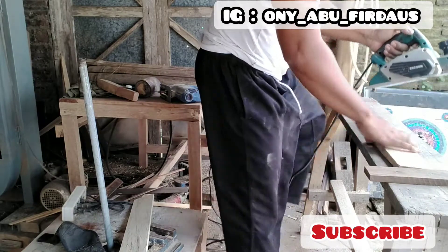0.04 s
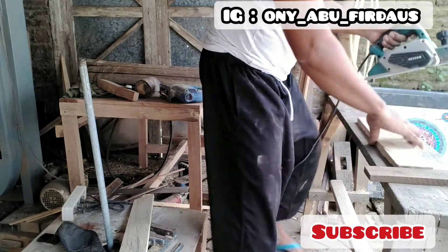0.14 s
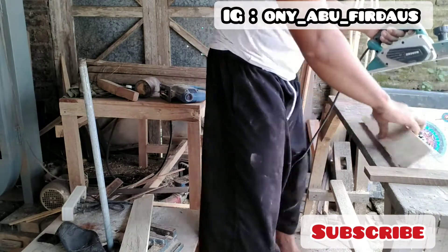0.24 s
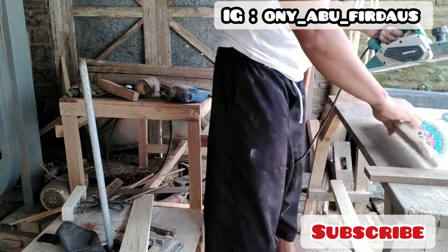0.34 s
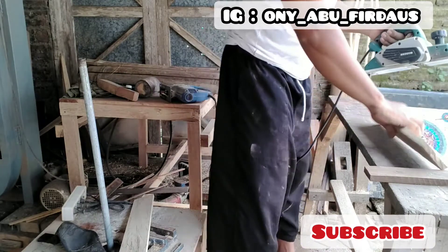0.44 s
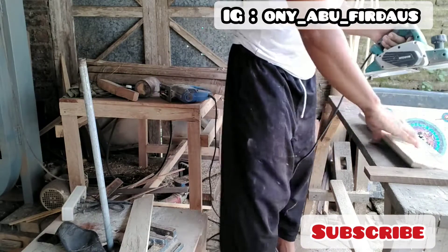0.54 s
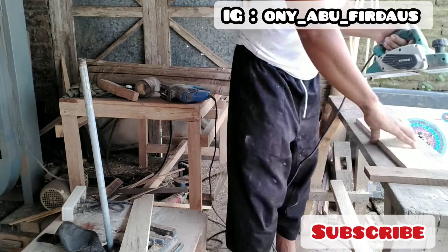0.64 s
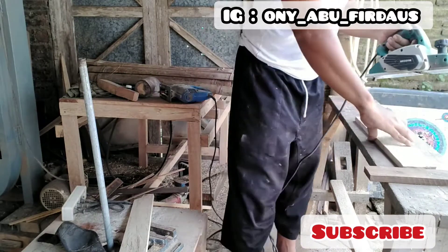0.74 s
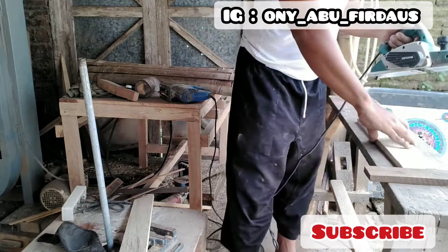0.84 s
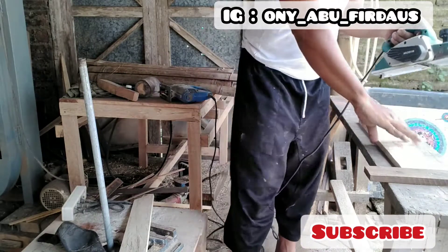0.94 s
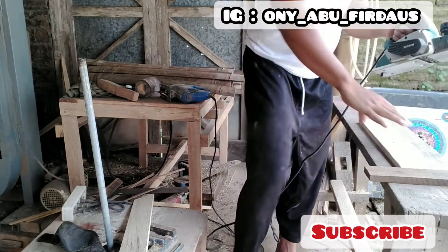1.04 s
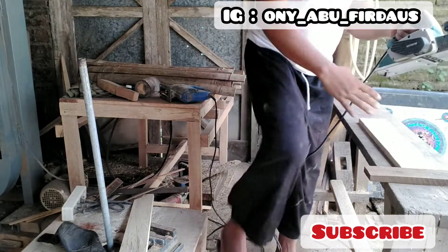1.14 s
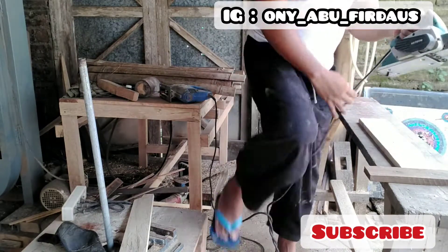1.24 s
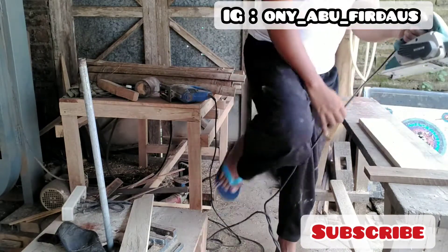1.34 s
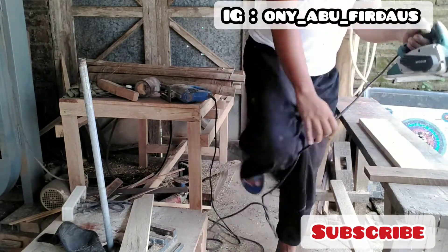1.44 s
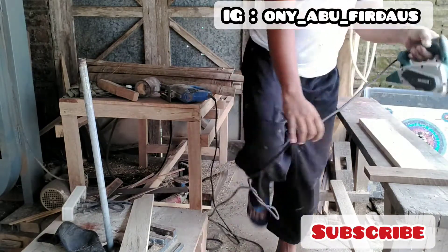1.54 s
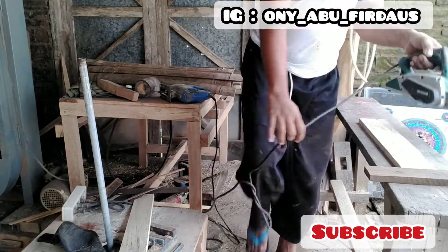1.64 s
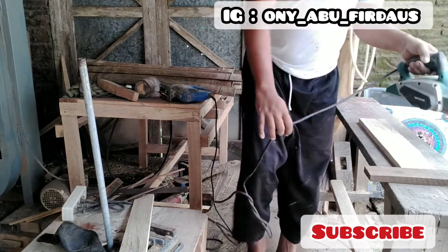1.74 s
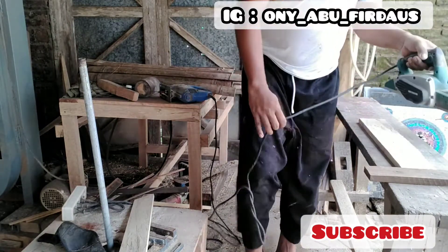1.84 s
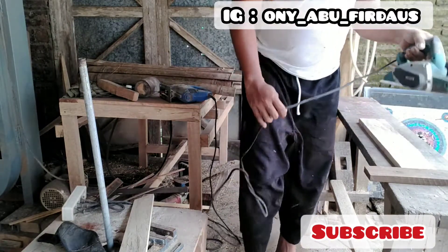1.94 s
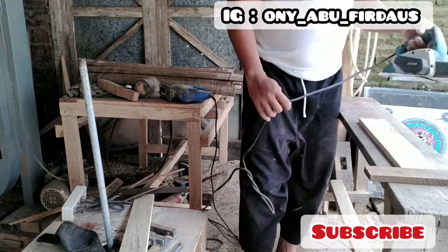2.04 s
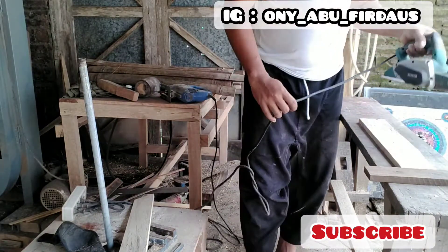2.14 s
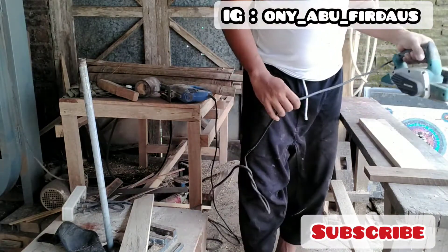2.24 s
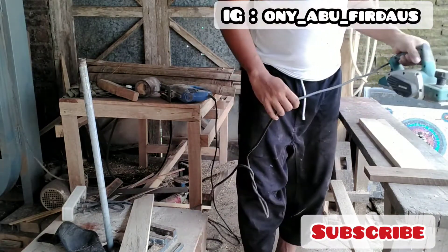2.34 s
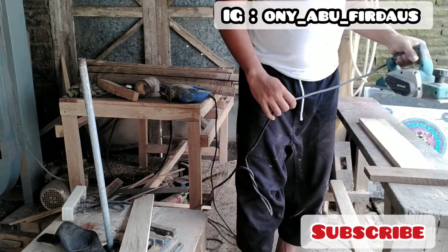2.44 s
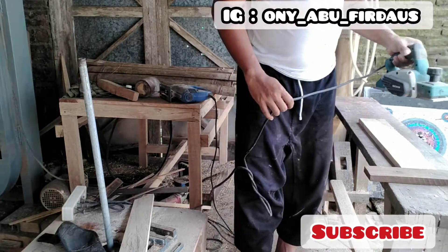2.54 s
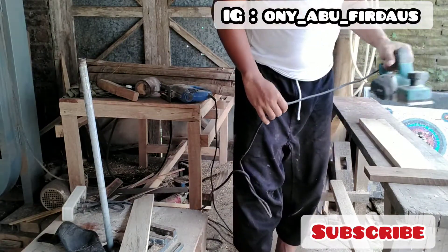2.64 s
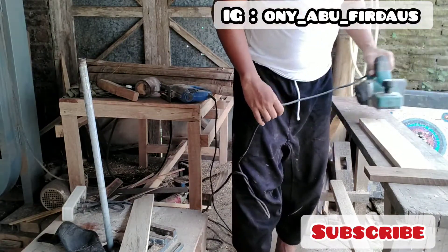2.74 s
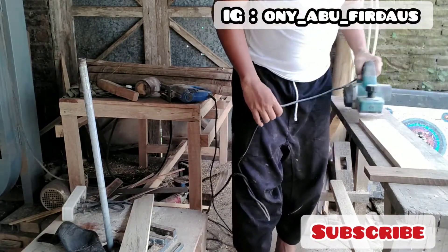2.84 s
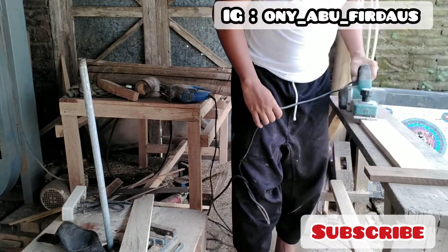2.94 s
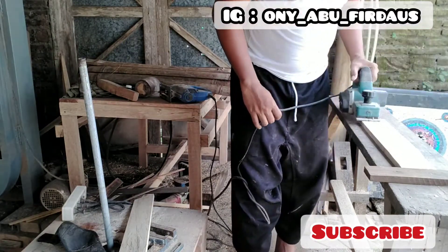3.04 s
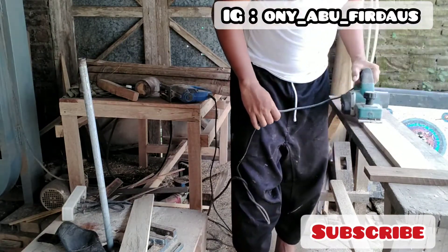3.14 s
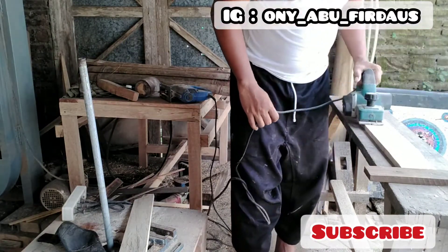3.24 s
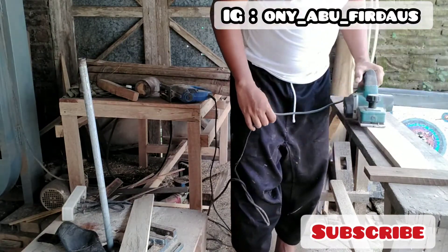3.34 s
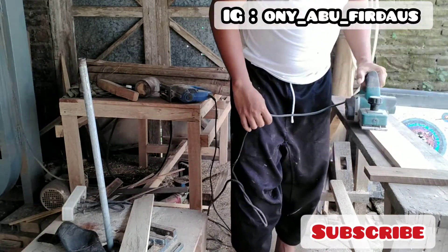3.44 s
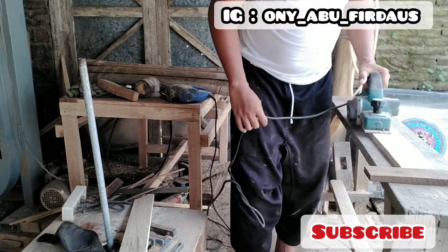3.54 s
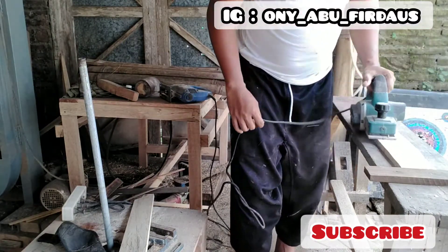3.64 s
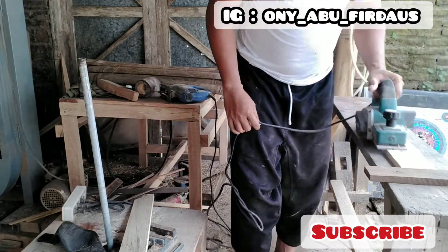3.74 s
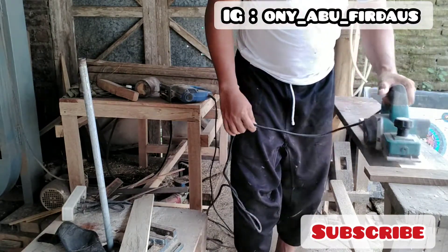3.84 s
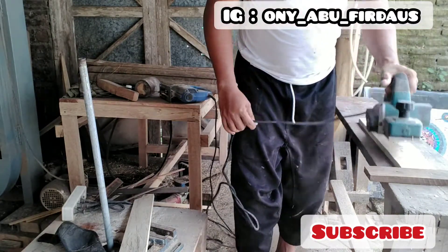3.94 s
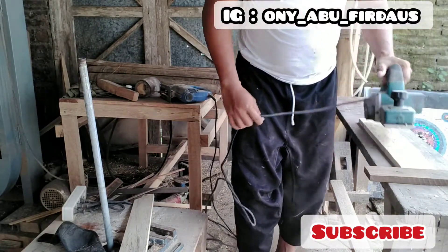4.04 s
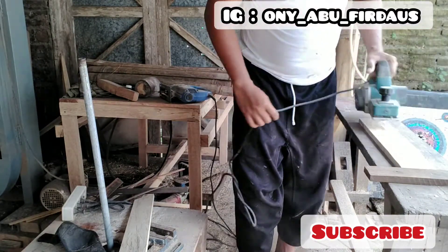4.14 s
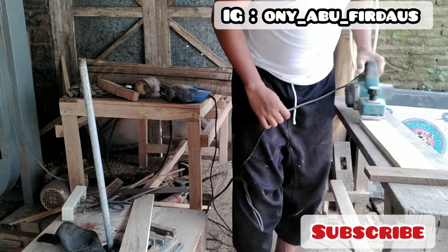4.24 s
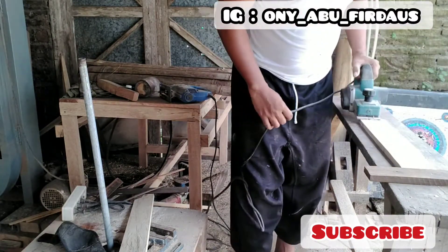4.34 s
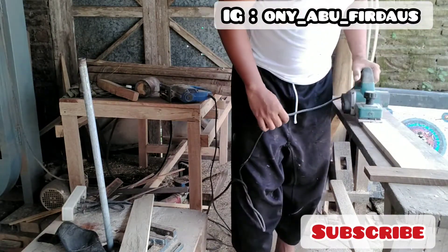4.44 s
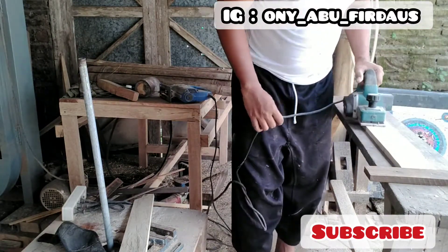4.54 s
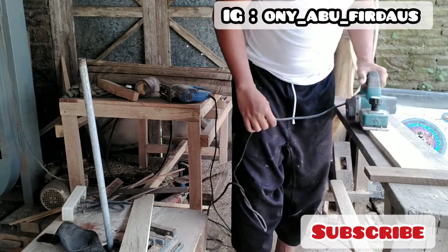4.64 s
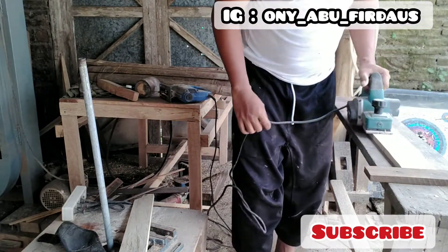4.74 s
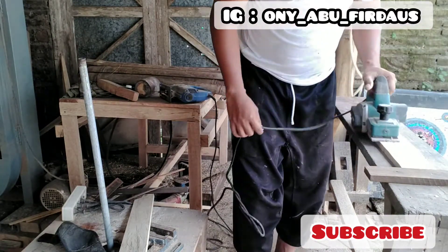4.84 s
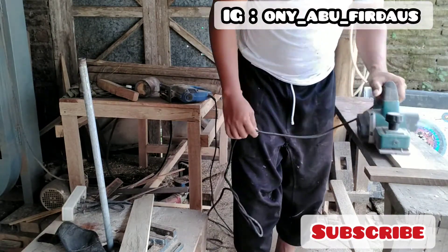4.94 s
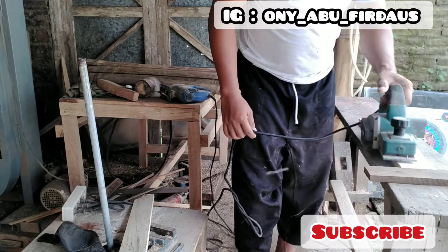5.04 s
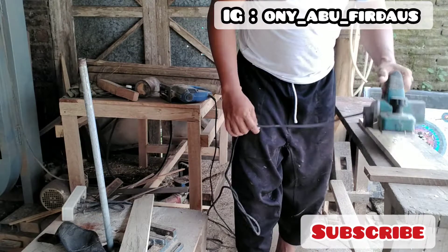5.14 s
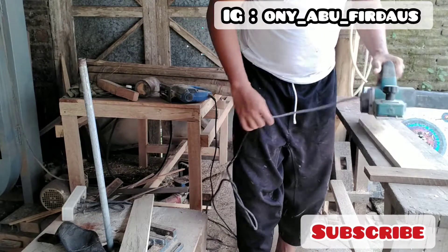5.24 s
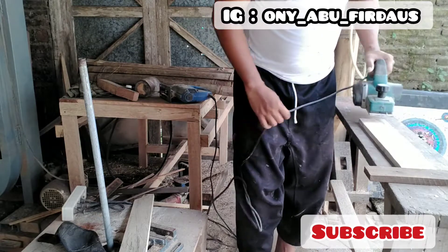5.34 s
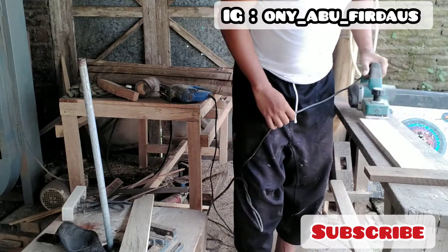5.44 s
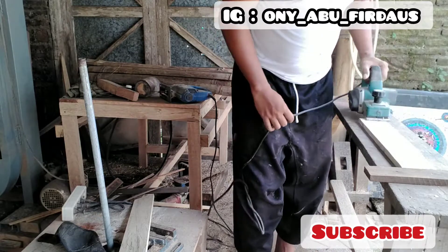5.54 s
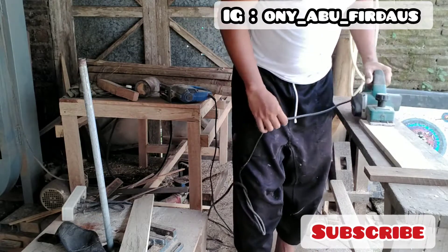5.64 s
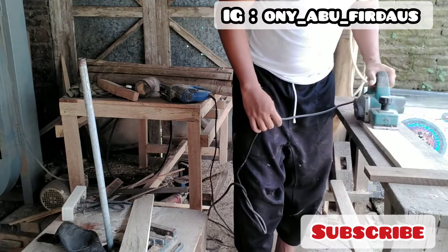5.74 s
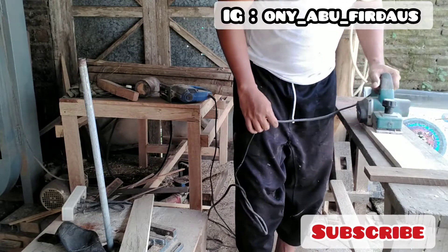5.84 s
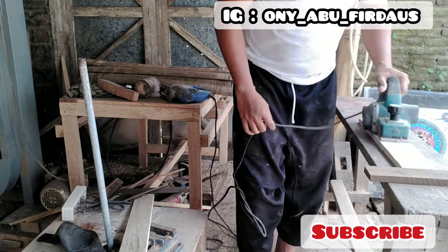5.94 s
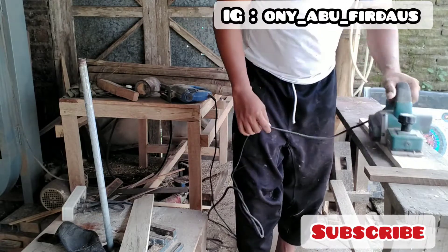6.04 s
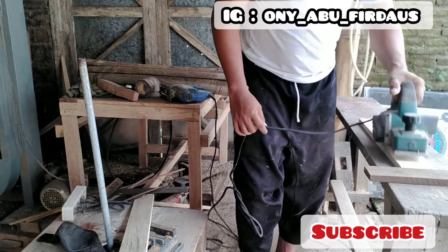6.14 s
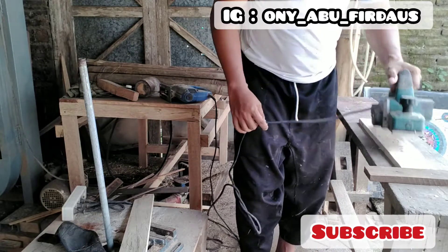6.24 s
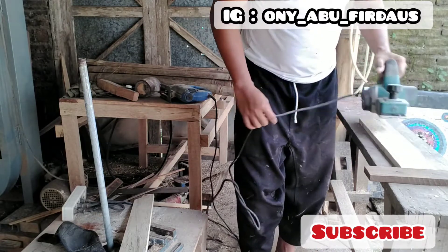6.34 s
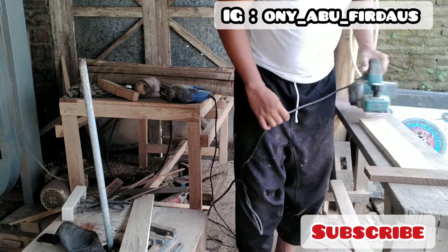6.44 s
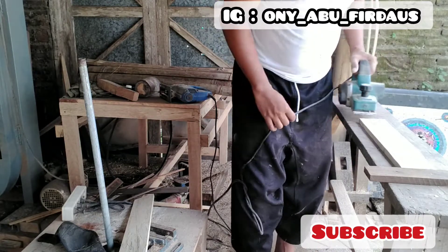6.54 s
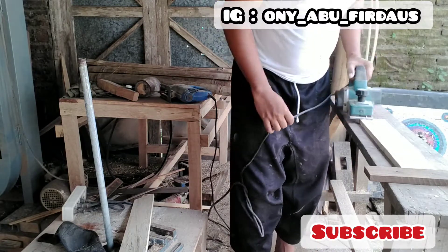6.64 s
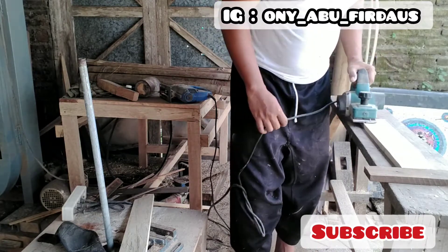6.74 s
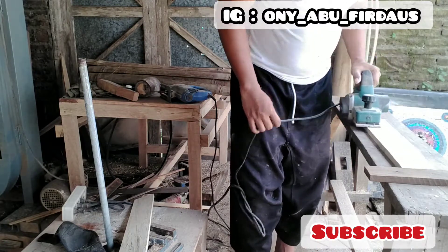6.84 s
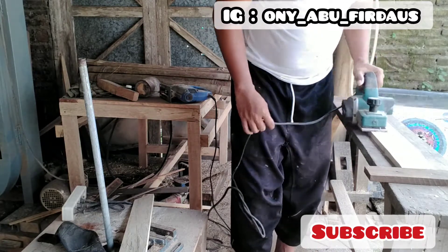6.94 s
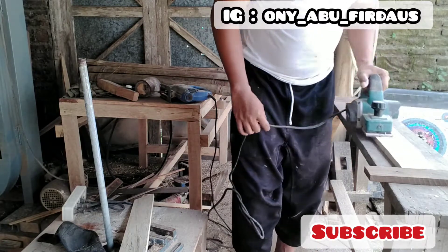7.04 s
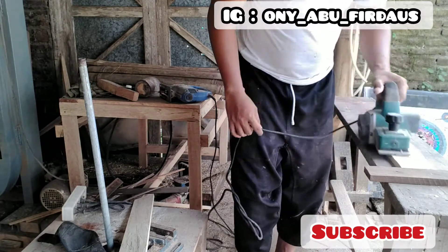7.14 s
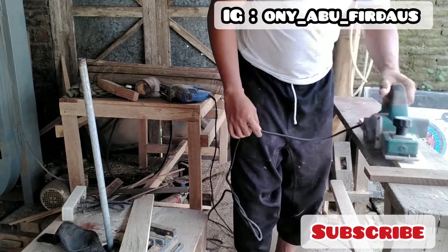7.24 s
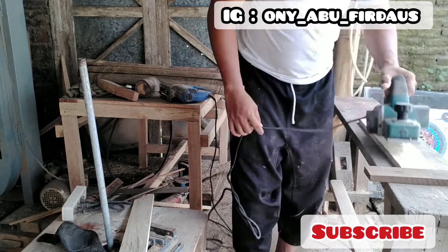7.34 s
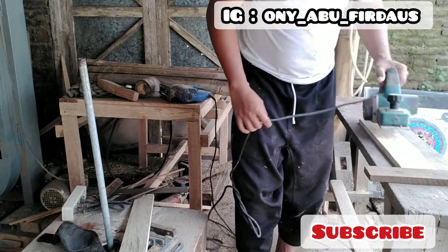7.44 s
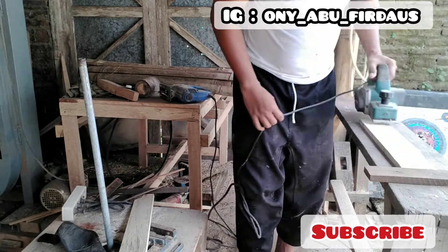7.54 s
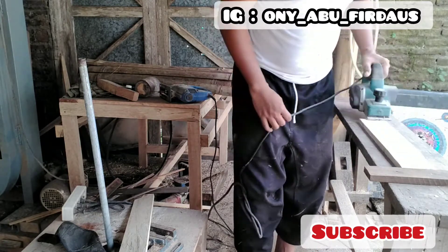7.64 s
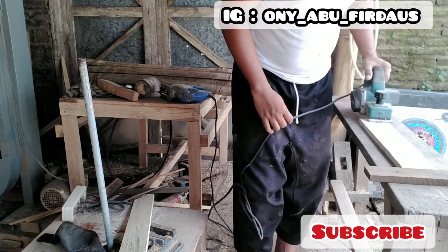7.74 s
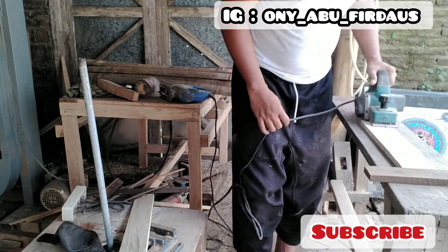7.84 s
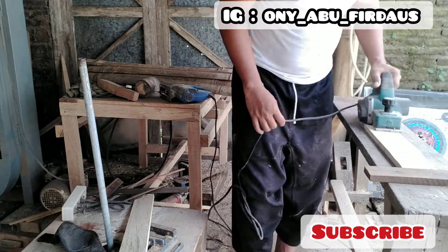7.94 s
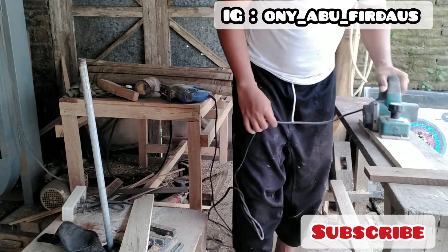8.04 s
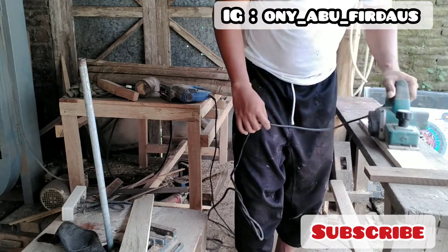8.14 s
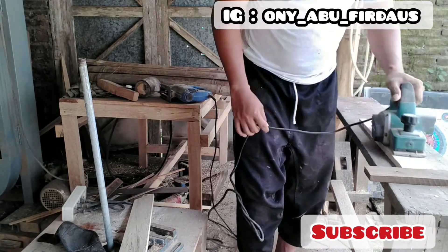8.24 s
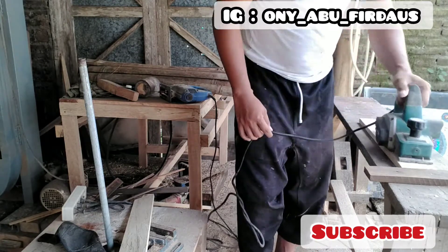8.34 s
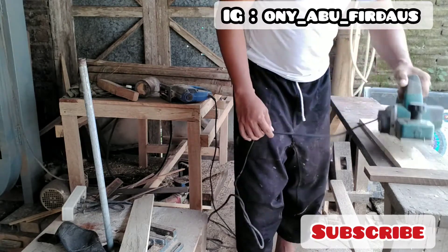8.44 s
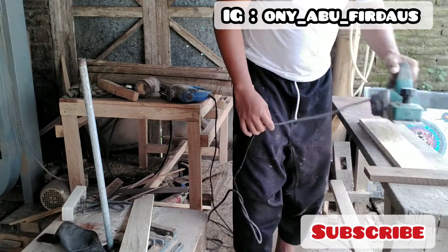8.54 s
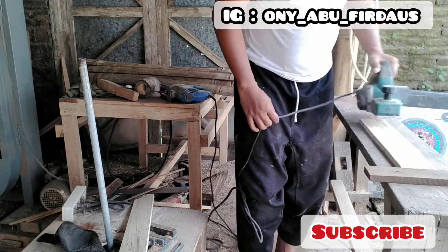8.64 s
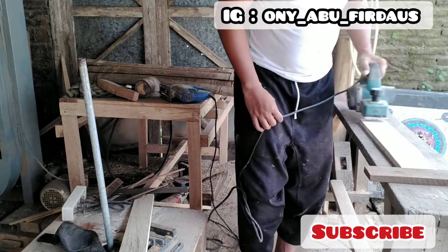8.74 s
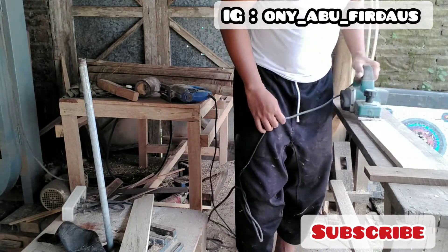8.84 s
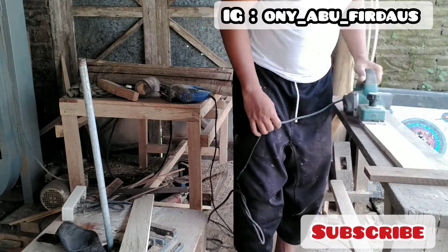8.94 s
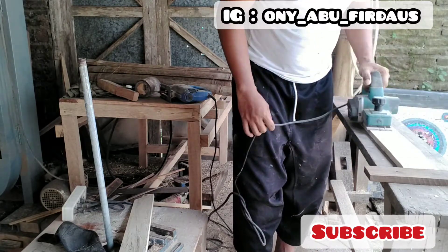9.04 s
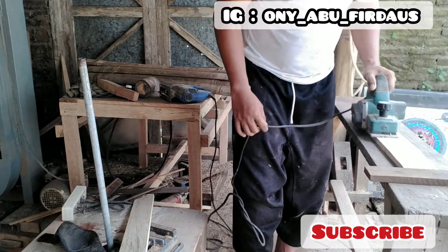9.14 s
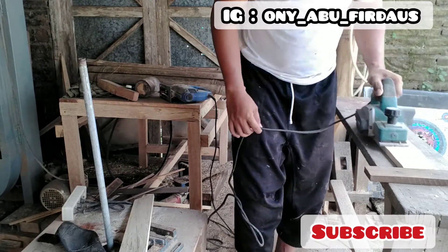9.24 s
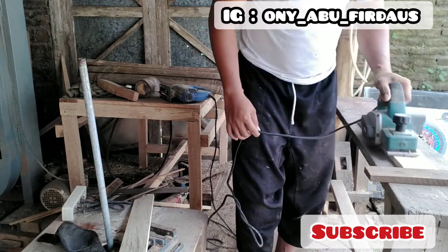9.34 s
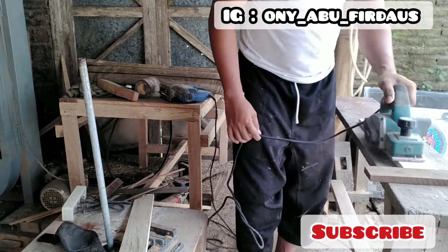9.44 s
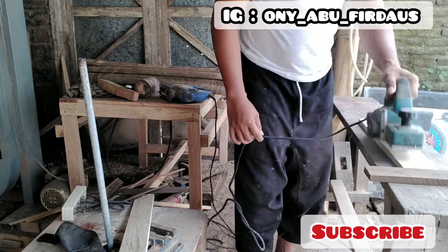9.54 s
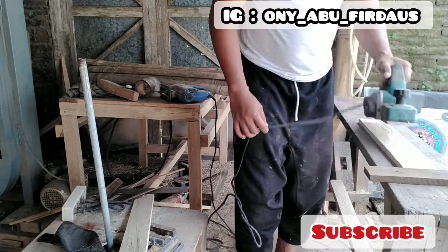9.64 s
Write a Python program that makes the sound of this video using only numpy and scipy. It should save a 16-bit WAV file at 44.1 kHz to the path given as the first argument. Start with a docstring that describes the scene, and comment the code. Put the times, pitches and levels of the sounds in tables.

```python
"""An electric hand planer runs up, its belt squealing, and makes six strokes along a board.
Motor and two-knife drum whine at unrelated pitches as summed shaft harmonics over a chopped noise fan rush.
In the wood, knife passes become pulses through resonances, chips are noise puffs and load drags the speed down.
Before it the board is flipped over and knocks on the bench (decaying modes and noise), with rubbing and
a faint clink; quiet workshop noise lies under everything."""
import sys
import numpy as np
from scipy import signal
from scipy.fft import rfft, irfft, next_fast_len
from scipy.io import wavfile
from scipy.ndimage import map_coordinates

SR = 44100
rng = np.random.default_rng(int(sys.argv[2]) if len(sys.argv) > 2 else 0)


def store_wav(level_fs):
    """Save 16-bit WAV to argv[1]."""
    pcm = np.round(np.clip(np.atleast_2d(level_fs), -1, 1) * 32767)
    wavfile.write(sys.argv[1], SR, pcm.T.astype(np.int16))


N = 427769
TIME = np.arange(N) / SR

# strong shaft partials: motor_order, drum_order, relative_idle_db, share_of_cut_whine_db
STRONG_PARTIALS = [(1, 0, -20, -0.4049), (2, 0, -19.5, -0.55), (3, 0, -25, 0), (4, 0, -20.5, -0.58),
                   (0, 2, -22, -0.43), (0, 4, -24.5, -0.13), (0, 6, -22, 0.31), (0, 8, -29, 1),
                   (0, 10, -30, 1), (0, 12, -33, 0.48)]
# weak shaft partials and combination tones: motor_order, drum_order, relative_level_db
WEAK_PARTIALS = [(5, 0, -16.5), (6, 0, -32), (8, 0, -26), (9, 0, -28), (0, 56, -26), (0, 3, -21),
                 (0, 14, -19.5), (1, 1, -13.5), (2, -1, -26.5), (1, 2, -25), (3, -1, -11), (2, 1, -9.5),
                 (2, 2, -21), (3, 1, -15), (2, 4, -17.5)]
# housing and bench response to the partials: freq_hz, gain_db
BODY_RESPONSE = [(280, -12), (370, -7), (425, 0), (452, -21), (482, -5.5), (503, -11), (535, -5),
                 (562, -8.5), (590, 1), (610, -8), (760, -7), (950, -1), (1025, -1), (1060, 1.5),
                 (1100, 0.5), (1145, 2.5), (1210, -3), (1400, -5.5), (1458, 3.5), (1510, -1.5), (1595, -9),
                 (1700, -0.5), (1810, -6.5), (1900, -3), (1960, 2), (2040, 0), (2130, 0), (2230, -3.5),
                 (2350, -0.5), (2620, 3.5), (2850, -3.5), (2990, -4), (3200, -6.5)]
# fan rush and rattle spectrum: freq_hz, relative_db
FAN_SPECTRUM = [(30, -30), (100, -27), (190, -27.5), (280, -15.5), (450, -9), (750, -0.5), (1300, -1.5),
                (2200, 1), (3300, -7.5), (4500, -15), (6600, -24.5), (8500, -13.5), (12500, -28),
                (15500, -28.5)]
# tool pushed nearer and drawn back: nearest_s, gain_db
PUSHES = [(3.1, 2), (3.9, 3), (5.2, 1.5), (6.3, 1), (7.38, 1), (8.55, 0.5), (9.6, 0.9)]
# knives in the wood: start_s, end_s, bite_db, whine_gain_db, drag_in_turns_per_s2, drag_out_turns_per_s2
CUTS = [(3.391, 3.512, -24.5, 9.1, 72.4, 89.95), (3.518, 3.635, -25, 9.3, 265, 214.9),
        (3.852, 3.884, -34.5, 7, 5, 50), (4.676, 4.847, -25, 12.2, 81, 335.4),
        (5.024, 5.068, -29, 7.2, 294, 148.2), (5.753, 5.952, -23, 6.3, 242, 377.6),
        (6.1, 6.179, -28, 7, 180, 80.05), (6.907, 7.147, -25, 5.2, 270, 196.2),
        (7.226, 7.291, -29.5, 4.6, 95, 64.6), (7.976, 8.123, -28, 14, 90, 118.2),
        (8.2, 8.438, -28, 10, 148, 110.2), (9.091, 9.292, -27.5, 13.2, 83, 159.7),
        (9.309, 9.531, -27, 9, 166, 129)]
# knife buzz spectrum: freq_hz, relative_db
KNIFE_SPECTRUM = [(200, -10), (1000, -18), (2300, 8.5), (3400, 8.5), (4400, 2.5), (6200, -5.5), (7500, -1),
                  (8800, 2.5), (10500, -19), (15000, -21)]
# chip hiss spectrum: freq_hz, relative_db
CHIP_SPECTRUM = [(40, -16), (100, 3), (180, 5), (280, 11.5), (500, -0.5), (2400, 9.5), (4500, -20),
                 (6500, -35), (8600, 6), (10500, 1), (15000, -14)]
# slipping belt: time_s, pitch_hz, relative_level_db
BELT_SQUEAL = [(2.302, 8400, -72), (2.31, 8070, -23), (2.328, 7120, -18.5), (2.345, 6900, -21.5),
               (2.365, 5500, -22), (2.42, 5700, -23), (2.48, 6800, -23.5), (2.495, 6750, -35),
               (2.54, 6650, -58)]
# board on bench, then trigger and motor kick: start_s, relative_peak_db, hardness_hz, attack_s
KNOCKS = [(0.503, -30, 1500, 0.00081), (0.522, -17.5, 1590, 0.00074), (0.551, -24, 900, 0.0018),
          (0.588, -29, 700, 0.0022), (0.676, -35, 900, 0.00091), (0.699, -34, 2500, .003),
          (0.712, -10, 2450, 0.00034), (0.957, -16, 1540, 0.0053), (0.978, -24, 1400, 0.0028),
          (2.313, -23, 2780, 0.00074), (2.323, -19.5, 2800, 0.0008)]
# ringing modes of the board: freq_hz, relative_level_db, t60_s
BOARD_MODES = [(212, -13, 0.24), (495, -14, 0.23), (700, -9.5, 0.34), (860, -30, .18), (1009, -10.5, 0.14),
               (1310, -5, 0.073), (1572, -7, 0.13), (1996, -11, 0.091), (2470, -3, 0.087), (3400, -9, 0.08)]
# woody clack spectrum: freq_hz, relative_db
CLACK_SPECTRUM = [(50, -28), (110, -15), (210, -2), (400, -2), (720, 0.5), (1500, 1.5), (3000, -10.5),
                  (5000, -27), (8600, -7), (13000, -23)]
# hand, board and cloth brushing past: centre_s, level_db, sigma_s, treble_gain_db
SCUFFS = [(0.252, -49.5, 0.012, -2), (0.312, -52, 0.036, -3), (0.376, -45, 0.021, 4),
          (0.667, -59, 0.029, -2), (0.735, -43.5, 0.027, -7), (0.812, -43.5, 0.02, -10),
          (0.864, -38, 0.021, -2), (1.149, -48, 0.017, 7), (1.976, -61, .012, 0), (2.096, -54.5, 0.049, 0),
          (2.165, -63, .01, 0)]
# rubbing spectrum: freq_hz, relative_db
RUB_SPECTRUM = [(40, -31), (350, -2), (750, -3), (1100, -1.5), (1700, -1), (2450, 2), (3200, -3.5),
                (4200, -10), (5300, -17), (7000, -17), (8600, -8), (11000, -24), (15000, -27)]
# metallic ring: freq_hz, level_db, t60_s
CLINK_MODES = [(2450, -50, .45), (3480, -54, 0.31), (4370, -52, 0.18)]
# quiet workshop spectrum: freq_hz, relative_db
FLOOR_SPECTRUM = [(25, -36), (75, -2), (130, 5), (350, 3), (680, -3.5), (745, 8), (820, -2.5), (1200, -7.5),
                  (1900, -8), (5500, -26), (8600, -23), (11000, -42), (15500, -46)]
# workshop decay: freq_hz, t60_s
ROOM_DECAY = [(150, 0.17), (1000, 0.19), (4000, 0.36), (12000, 0.028)]

SWITCH_ON_S = 2.3
FREE_TURNS_PER_S, INERTIA_S = 576.3, 0.836
SURGE_SHARE, SURGE_S = 0.527, 0.177  # share of speed won quickly by the starting current
DRUM_RATIO = 0.5595  # drum turns per motor turn, before belt slip
BELT_GIVE_S, BELT_LAG_S = 0.061, 0.02  # motor-side speed lost to slip per unit drag, and its delay
DRAG_ATTACK_S, DRAG_RELEASE_S = 0.012, 0.046
TORQUE_PULSE_HZ = 100  # twice per mains cycle

FAN_START_DB, FAN_FULL_DB, FAN_FULL_TURNS_PER_S = -36, -23, 452  # before pushes
PUSH_SIGMA_S = 0.23
WHINE_DB, WHINE_GROWTH = -2.5, 0.63  # growth: dB of whine per dB of fan rush
SWELL_DB, SWELL_KNOTS_PER_S = 2.1, 12  # partials swell and fade as the tool moves
WHINE_RELEASE_S = 0.17  # cut's whine change dies away

BITE_ATTACK_S, BITE_RELEASE_S = 0.0084, 0.048
ENTRY_DB, ENTRY_S = 4, 0.026  # harder bite on entering the wood
BUZZ_DB, CHIPS_DB = 3.5, -3  # over the bite
PASS_JITTER_S = 4e-6

SLOTS_PER_TURN = 12
SLOT_DB, SLOT_RING_HZ, SLOT_HALF_WIDTH_HZ = -20, 3140, 48  # housing resonance
TOP_HZ = 15850


def whine(motor_turns, drum_turns, air_db, whine_db):
    """Shaft harmonics and sum/difference tones; cutting lowers motor orders and lifts high knife orders."""
    strong = np.zeros(N)
    for motor_order, drum_order, idle_db, share in STRONG_PARTIALS:
        turns = motor_order * motor_turns + drum_order * drum_turns
        pitch_hz = np.abs(np.gradient(turns)) * SR
        swell_db = SWELL_DB * wobble(SWELL_KNOTS_PER_S)
        level_db = idle_db + share * whine_db + along(BODY_RESPONSE, pitch_hz) + swell_db
        strong += amp(level_db) * partial(turns, flutter_db=2.5, jitter_rad=0.18)
    weak = np.zeros(N)
    for motor_order, drum_order, db in WEAK_PARTIALS:
        turns = motor_order * motor_turns + drum_order * drum_turns
        weak += amp(db + 1.5 * wobble(7)) * partial(turns, flutter_db=3, jitter_rad=0.3)
    fade_in = np.clip((TIME - 2.45) / 0.16, 0, 1)
    strong_gain = amp(WHINE_GROWTH * (air_db - FAN_FULL_DB) + WHINE_DB)
    return fade_in * (strong_gain * strong + amp(air_db - 2) * room(weak, wet_db=-2.5))


def partial(turns, flutter_db, jitter_rad):
    """A sine of rms 1 with random level flutter and phase jitter."""
    jitter = jitter_rad * (wobble(45) + 0.49 * wobble(220))
    return unit(amp(flutter_db * wobble(28)) * np.sin(2 * np.pi * turns + jitter))


def fan(motor_turns, drum_turns, air_db):
    """Air chopped once a motor turn, plus housing rattle when both shafts shake it at once."""
    motor_phase, drum_phase = 2 * np.pi * motor_turns, 2 * np.pi * drum_turns
    air = unit((1 + 0.45 * np.cos(motor_phase)) * rng.standard_normal(N))
    rush = unit(coloured(air, FAN_SPECTRUM))
    shakes = np.exp(6 * np.cos(motor_phase + 0.18 * wobble(90)) + 9 * np.cos(drum_phase))
    shakes = shakes * (TIME > SWITCH_ON_S)
    jolts = np.diff(shakes, prepend=shakes[0])
    rattle = unit(room(coloured(jolts, FAN_SPECTRUM), wet_db=3))
    torque = np.cos(2 * np.pi * TORQUE_PULSE_HZ * TIME)
    level_db = air_db + 0.5 * torque + 0.73 * wobble(35)
    return amp(level_db) * (amp(-0.1) * rush + amp(-7) * rattle)


def cutting(drum_turns, bite):
    """Each knife pass strikes the wood with a sharp pulse and throws a decaying puff of chips."""
    streaks = amp(1.17 * wobble(30))  # hard and soft streaks in the board
    passes = 2 * drum_turns
    buzz = unit(coloured(ringing(knife_blows(passes), t60_s=0.03), KNIFE_SPECTRUM))
    puffs = amp(-7 * (passes % 1)) * rng.standard_normal(N)
    chips = unit(coloured(puffs, CHIP_SPECTRUM))
    wet_buzz = room(amp(BUZZ_DB) * streaks * bite * buzz, wet_db=-6)
    return wet_buzz + amp(CHIPS_DB) * streaks * bite * chips


def knife_blows(passes):
    """One band-limited pulse per knife pass, alternating in size as one knife stands proud."""
    count = np.arange(1, int(passes[-1]))
    timing, strength = rng.standard_normal((2, len(count)))
    at_sample = np.interp(count, passes, np.arange(N)) + SR * PASS_JITTER_S * timing
    size = amp(1.2 * strength) * (1 + 0.75 * (-1) ** count)
    # 16-tap sinc places each pulse between samples
    taps = at_sample.astype(int)[:, None] + np.arange(-7, 9)
    pulses = size[:, None] * np.sinc(taps - at_sample[:, None])
    return np.bincount(np.clip(taps, 0, N).ravel(), pulses.ravel(), N + 1)[:N]


def ringing(x, t60_s):
    """Dense short resonances: gliding partials swell and fade as they cross them."""
    t = np.arange(SR // 10) / SR
    response = rng.standard_normal(len(t)) * amp(-60 * t / t60_s)
    return unit(signal.fftconvolve(x, response)[:N])


def start_up(motor_turns, motor_speed):
    """Belt squeals under pulsing starting torque; armature slots sing through a housing resonance."""
    pitch_hz, level_db = curves(BELT_SQUEAL, outside=-120)
    torque = np.sin(2 * np.pi * TORQUE_PULSE_HZ * TIME)
    pitch_hz = pitch_hz * (1 + 0.029 * torque + 0.042 * wobble(1500))
    phase = 2 * np.pi * np.cumsum(pitch_hz) / SR
    overtone = amp(-13) * np.sin(2 * phase + wobble(2800))
    squeal = amp(level_db + 3.1 * torque) * (np.sin(phase) + overtone)
    detune = (SLOTS_PER_TURN * motor_speed - SLOT_RING_HZ) / SLOT_HALF_WIDTH_HZ
    resonance = (TIME > SWITCH_ON_S) / np.hypot(1, detune)
    slot_phase = 2 * np.pi * SLOTS_PER_TURN * motor_turns + wobble(400)
    slots = amp(SLOT_DB) * resonance * np.sin(slot_phase)
    return room(amp(5) * squeal + slots, wet_db=-6.5)


def strokes():
    """Cuts as three controls: knife bite gain, whine change in dB, drag on the drive."""
    bite, whine_db, drag = np.zeros((3, N))
    for start, end, bite_db, gained_db, drag_in, drag_out in CUTS:
        contact = gate(start, end, BITE_ATTACK_S, BITE_RELEASE_S)
        entry_db = ENTRY_DB * np.exp(-np.maximum(TIME - start, 0) / ENTRY_S)
        bite = np.maximum(bite, amp(bite_db + entry_db) * contact)
        whine_db = np.maximum(whine_db, gained_db * gate(start, end, BITE_ATTACK_S, WHINE_RELEASE_S))
        load = np.interp(TIME, [start, end], [drag_in, drag_out])
        drag = drag + load * gate(start, end, DRAG_ATTACK_S, DRAG_RELEASE_S)
    return bite, whine_db, drag


def shaft_speeds(drag):
    """Turns per s: motor runs up and sags under drag; drum sags further as the belt slips."""
    t = np.maximum(TIME - SWITCH_ON_S, 0)
    run_up = 1 - SURGE_SHARE * np.exp(-t / SURGE_S) - (1 - SURGE_SHARE) * np.exp(-t / INERTIA_S)
    loaded = np.maximum(FREE_TURNS_PER_S * run_up - lagged(drag, INERTIA_S), 0)
    motor_speed = loaded * (1 + 0.000838 * wobble(25))
    slip = BELT_GIVE_S * lagged(drag, BELT_LAG_S)
    drum_speed = DRUM_RATIO * (motor_speed - slip) * (1 + 0.0008 * wobble(30))
    return motor_speed, drum_speed


def rush_level(motor_speed):
    """Fan rush in dB: grows with speed squared up to full flow, swells as the tool comes near."""
    flow = np.minimum(motor_speed / FAN_FULL_TURNS_PER_S, 1) ** 2
    near_db = sum(db * np.exp(-0.5 * ((TIME - s) / PUSH_SIGMA_S) ** 2) for s, db in PUSHES)
    level_db = FAN_START_DB + (FAN_FULL_DB - FAN_START_DB) * flow + near_db
    return np.where(TIME > SWITCH_ON_S + 0.008, level_db, -120)


def knocks():
    """Each blow gives a woody clack and short modal ring; softer contact takes the treble away."""
    out, t = np.zeros(N + SR), np.arange(SR // 2) / SR
    for s, db, hard_hz, attack in KNOCKS:
        ring = np.zeros(len(t))
        for hz, level_db, t60 in BOARD_MODES:
            decay = amp(level_db + rng.normal(0, 1.7) - 60 * t / t60)
            ring += decay * np.sin(2 * np.pi * hz * t)
        clack = unit(coloured(rng.standard_normal(len(t)), CLACK_SPECTRUM)) * amp(-60 * t / 0.14)
        strike = (ring + 2.95 * clack) * (1 - np.exp(-t / attack))
        blow = signal.lfilter(*signal.butter(2, [100, hard_hz], "band", fs=SR), strike)
        out[round(s * SR):][:len(t)] += amp(db + 0.5) * blow / np.abs(blow).max()
    return room(out[:N], wet_db=-8)


def sliding():
    """Rubbing as short grainy noise swishes, each with its own brightness."""
    grains = amp(2.7 * wobble(300)) * rng.standard_normal(N)
    rub = unit(coloured(grains, RUB_SPECTRUM))
    treble = signal.sosfiltfilt(signal.butter(2, 5000, "high", fs=SR, output="sos"), rub)
    swishes = np.zeros(N)
    for s, db, sigma, treble_db in SCUFFS:
        swell = np.exp(-0.5 * ((TIME - s) / sigma) ** 2)
        swishes += amp(db) * swell * unit(rub + (amp(treble_db) - 1) * treble)
    return room(swishes, wet_db=-10.5)


def clink():
    """Faint metallic ring as the board is lifted: decaying sines."""
    t = np.maximum(TIME - 0.238, 0)
    ring = sum(amp(db - 60 * t / t60) * np.sin(2 * np.pi * hz * t) for hz, db, t60 in CLINK_MODES)
    return (1 - np.exp(-t / 0.008)) * ring


def workshop_floor():
    """Quiet workshop: coloured noise with a slightly wandering level."""
    return amp(-58.5 + 0.61 * wobble(5.5)) * noise(FLOOR_SPECTRUM)


def room(x, wet_db):
    """Direct sound plus a short decaying-noise tail, at roughly unchanged power."""
    hz, t, z = signal.stft(rng.standard_normal(SR // 2), SR, nperseg=256)
    decay = amp(-60 * t / along(ROOM_DECAY, hz)[:, None])
    tail = signal.istft(z * decay, SR, nperseg=256)[1]
    echo = signal.fftconvolve(x, tail / np.linalg.norm(tail))[:N]
    return (x + amp(wet_db) * echo) / np.hypot(1, amp(wet_db))


def amp(db):
    """Decibels to gain."""
    return 10 ** (np.asarray(db) / 20)


def unit(x):
    """Scale to rms 1."""
    return x / np.sqrt(np.mean(x ** 2) + 1e-20)


def along(points, hz):
    """Interpolate (freq_hz, value) points on a log frequency axis."""
    f, v = np.transpose(points)
    return np.interp(np.log(hz + 1), np.log(f + 1), v)


def curves(rows, outside=None):
    """One value per sample for each column after the time."""
    s, *cols = np.transpose(rows)
    return [np.interp(TIME, s, c, outside, outside) for c in cols]


def wobble(knots_per_s):
    """Smooth random curve through normal-distributed knots."""
    knots = rng.standard_normal(int(N * knots_per_s / SR) + 4)
    return map_coordinates(knots, [TIME * knots_per_s], order=2)


def coloured(x, spectrum):
    """Filter x by a smooth (freq_hz, db) response."""
    m = next_fast_len(len(x) + 8192)
    gain = amp(along(spectrum, np.fft.rfftfreq(m, 1 / SR)))
    return irfft(rfft(x, m) * gain, m)[:len(x)]


def noise(spectrum):
    """Coloured noise of rms 1."""
    return unit(coloured(rng.standard_normal(N), spectrum))


def lagged(x, seconds):
    """First-order lag."""
    keep = np.exp(-1 / (seconds * SR))
    return signal.lfilter([1 - keep], [1, -keep], x)


def gate(start, end, attack, release):
    """Linear attack, hold, exponential release."""
    rise = np.clip((TIME - start) / attack, 0, 1)
    return rise * np.exp(-np.clip((TIME - end) / release, 0, 20))


def scene():
    """Planer, handling noises and workshop floor, summed to one channel."""
    bite, whine_db, drag = strokes()
    motor_speed, drum_speed = shaft_speeds(drag)
    motor_turns, drum_turns = np.cumsum([motor_speed, drum_speed], axis=1) / SR
    air_db = rush_level(motor_speed)
    planer = whine(motor_turns, drum_turns, air_db, whine_db) + fan(motor_turns, drum_turns, air_db)
    planer = planer + cutting(drum_turns, bite) + start_up(motor_turns, motor_speed)
    handling = knocks() + sliding() + clink()
    return (planer + handling + workshop_floor())[None]


def record(dry):
    """Steep low-pass: a 200 Hz wide linear slope centred on TOP_HZ."""
    m = next_fast_len(N + 8192)
    passband = np.clip((TOP_HZ - np.fft.rfftfreq(m, 1 / SR)) / 200 + 0.5, 0, 1)
    return irfft(rfft(dry, m) * passband, m)[:, :N]


dry = scene()
out = record(dry)
store_wav(out)
```